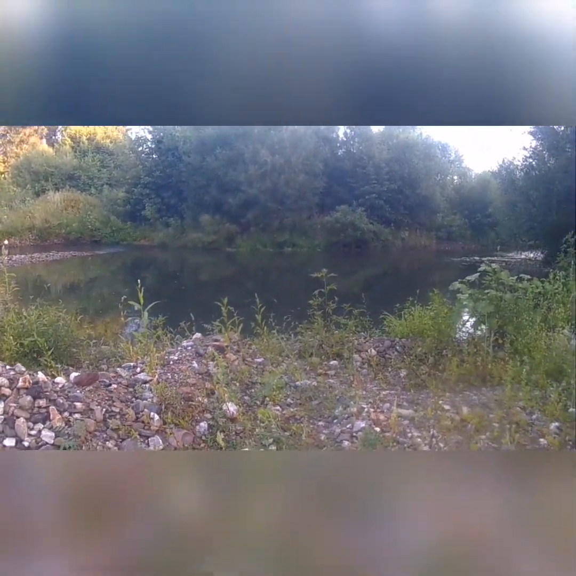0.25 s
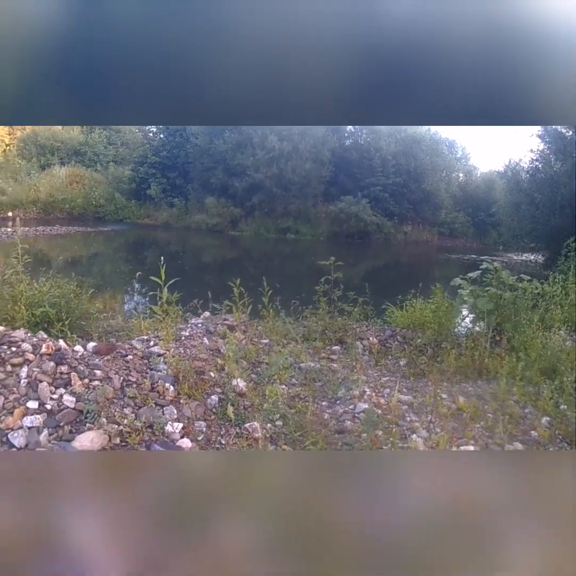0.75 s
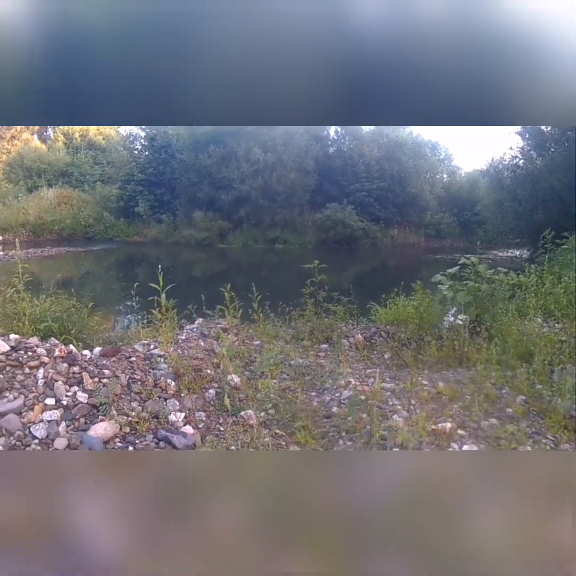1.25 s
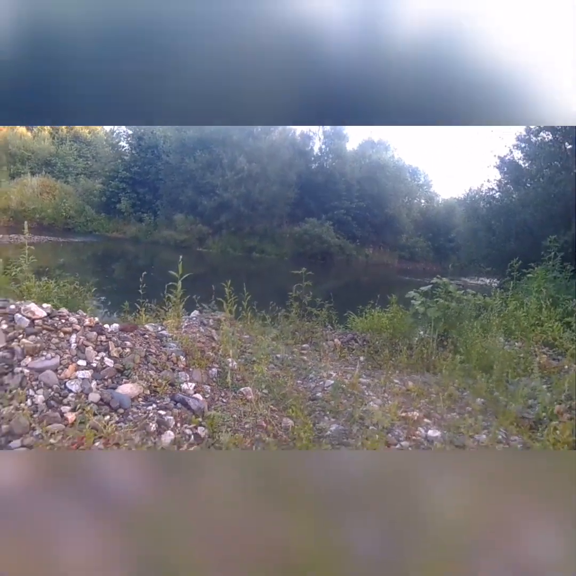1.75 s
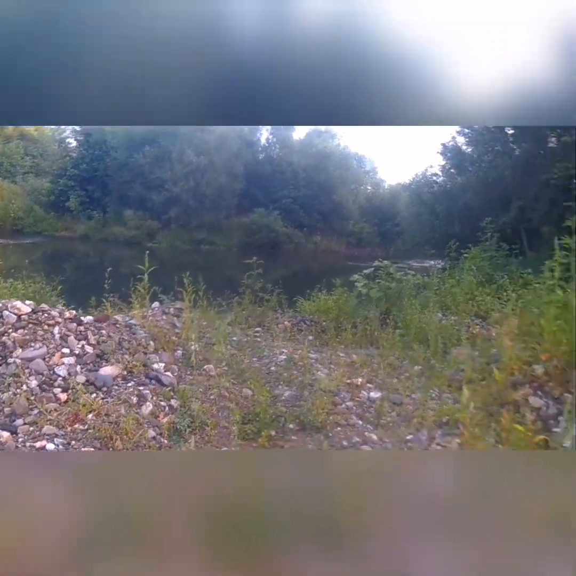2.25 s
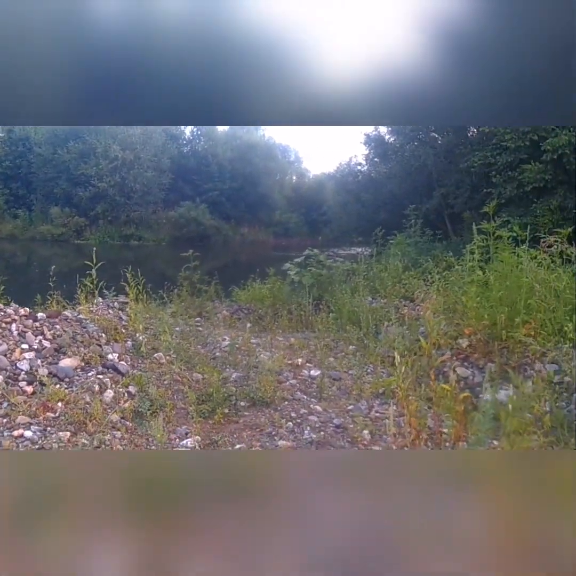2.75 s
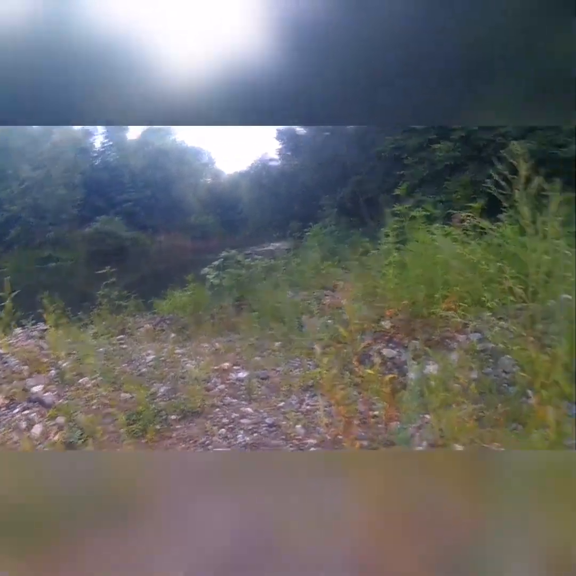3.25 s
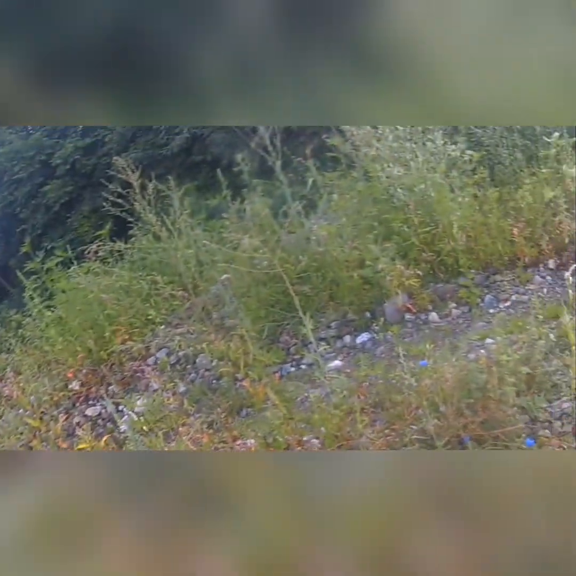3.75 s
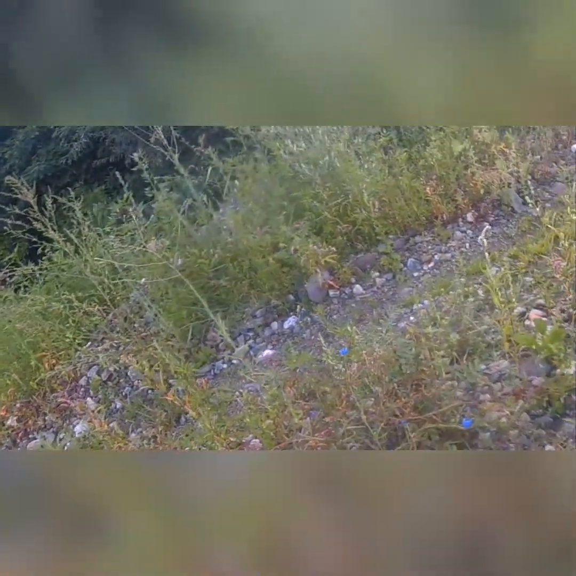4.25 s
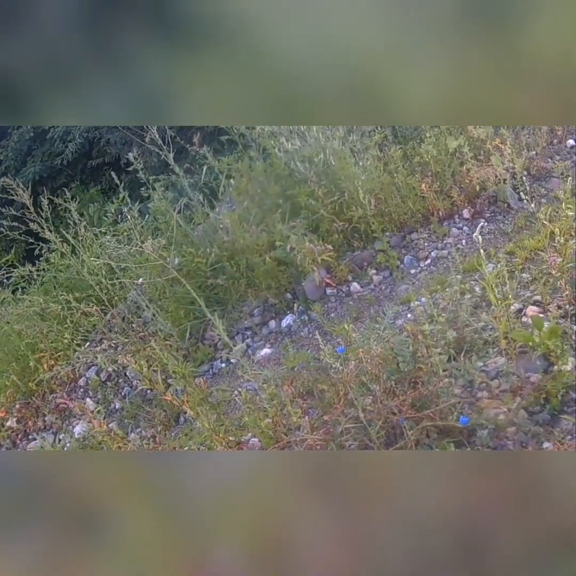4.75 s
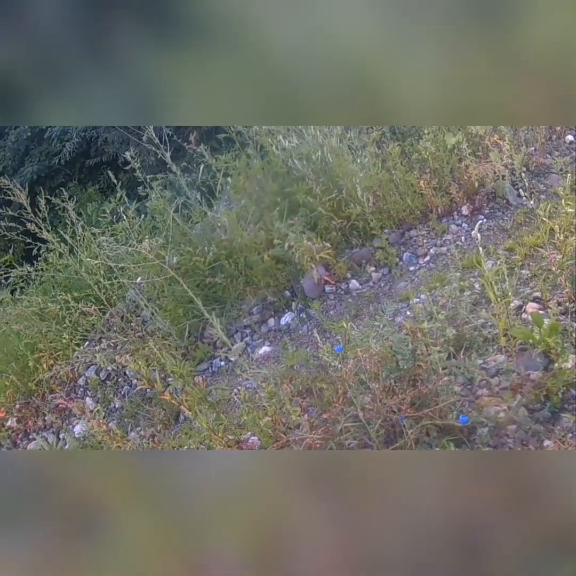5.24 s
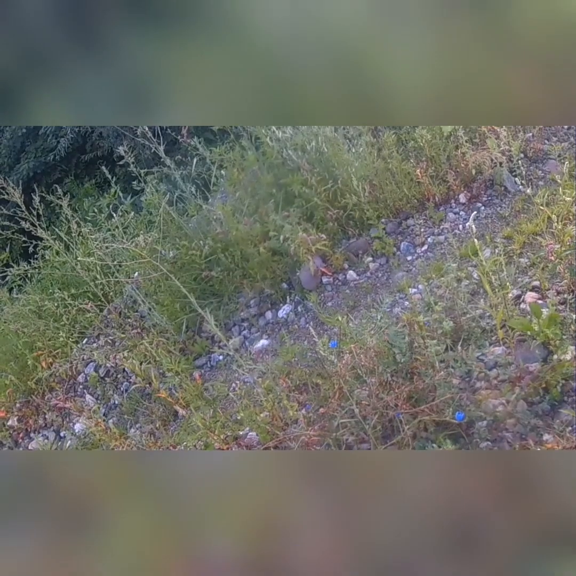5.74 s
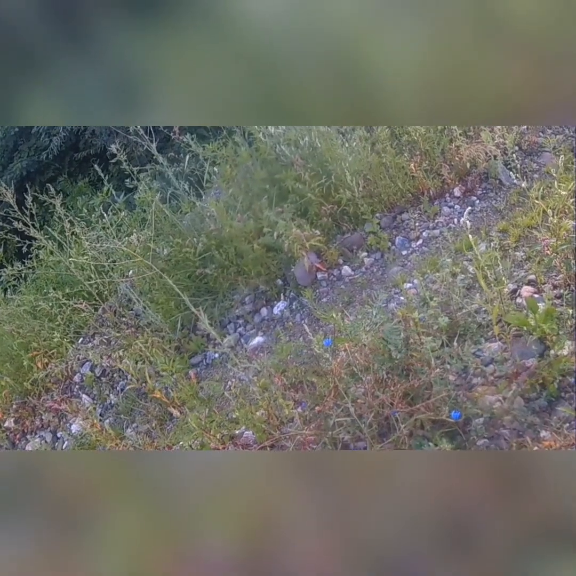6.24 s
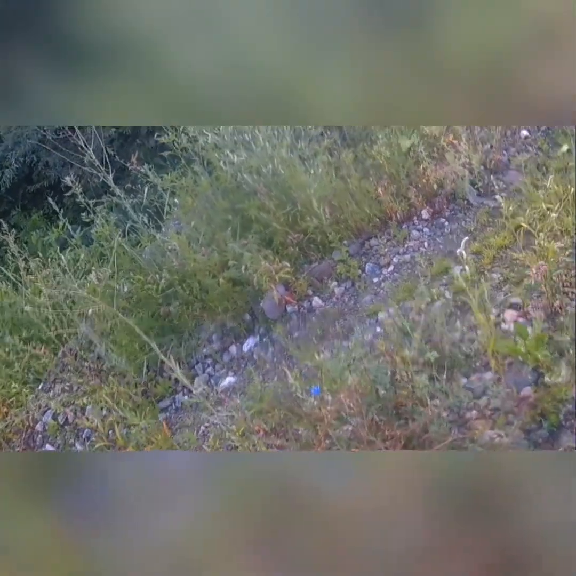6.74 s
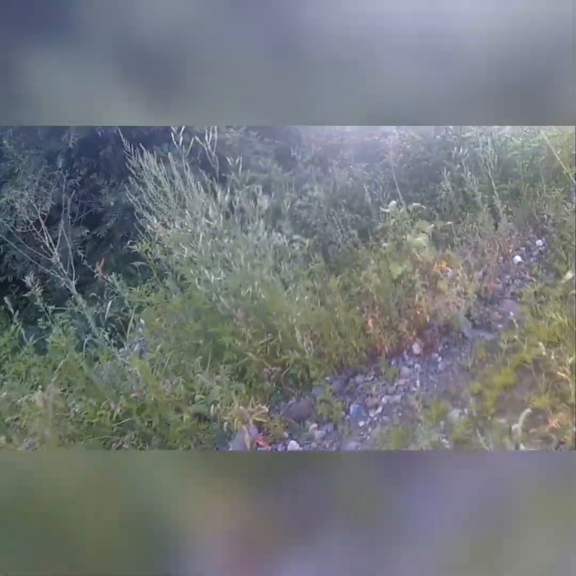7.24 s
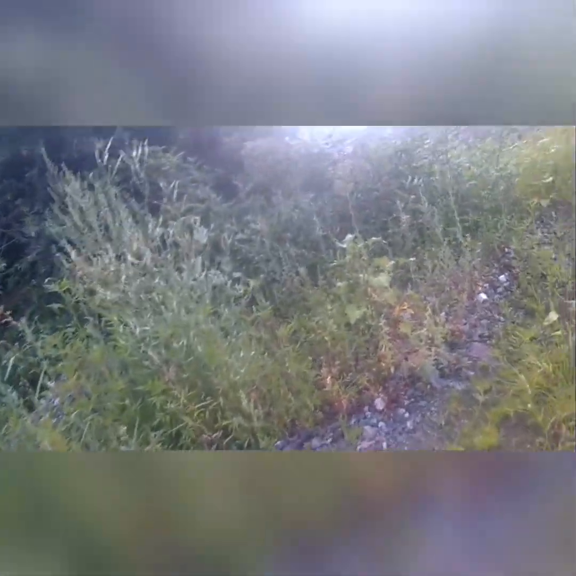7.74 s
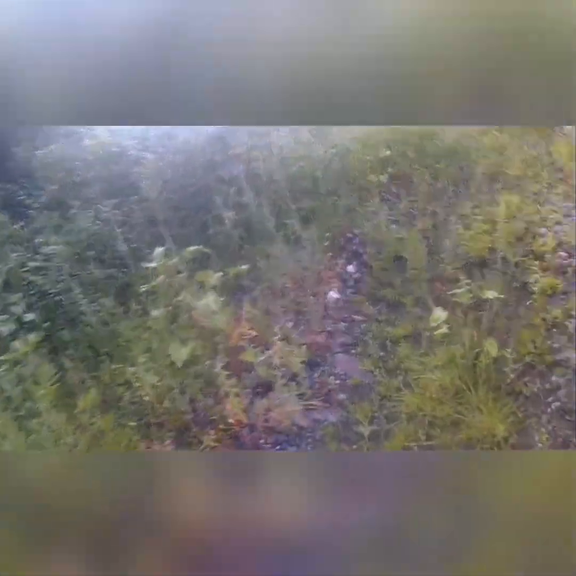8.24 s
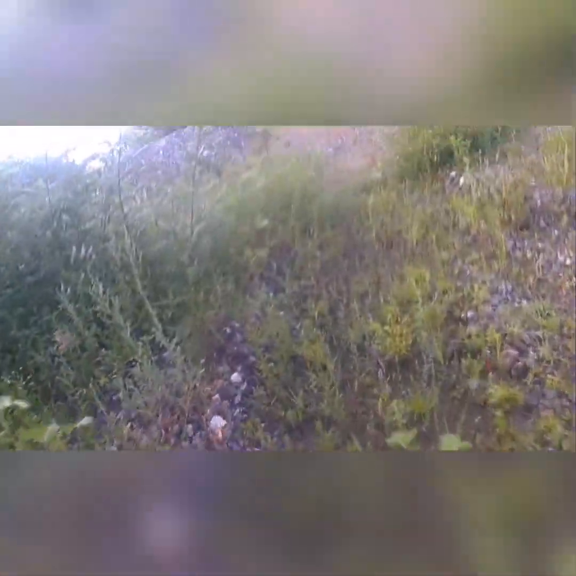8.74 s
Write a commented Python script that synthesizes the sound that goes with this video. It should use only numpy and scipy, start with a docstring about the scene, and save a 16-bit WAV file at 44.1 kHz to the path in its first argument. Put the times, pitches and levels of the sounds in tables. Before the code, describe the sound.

From 0 to about 4 s a small moped idles quietly: rapid, uneven putters around 25 per second, with a hollow metallic ring and scattered short gritty knocks, over very faint hiss. Slight bumps touch the mount near 2.5 and 3.4 s. At 4.1 to 4.6 s the engine starts to pull, its ring roughens, and several dull jolts thump. After a brief calmer spell, stronger jolts with rattles cluster at 5.3 to 6 s while the engine rises; a hard, short crack lands at 6 s. From about 6.2 s the camera housing slams and jiggles in its mount, a loud, harsh, overloaded buzz near 60 beats per second with loose plastic clatter. It eases briefly around 7.4 s, with two jolts, then surges again, uneven and stone-shaken, and is still going at the end, about 9 s. Close, boxy, narrow microphone sound.

```python
"""A moped idles with a ringing clatter and short knocks, then pulls off into a harsh, overloaded shaking.
Uneven bursts of noise at the firing rate ring the frame. Under way a small camera in a hard housing
swings, jiggles and rattles in its mount; jolts and stones shake it more.
The microphone amplifier clips the sum at its rails; the recorder response, faint hiss and whine follow."""
import sys
import numpy as np
from scipy import signal
from scipy.fft import rfft, irfft
from scipy.io import wavfile
from scipy.ndimage import uniform_filter1d

SR = 44100
rng = np.random.default_rng(int(sys.argv[2]) if len(sys.argv) > 2 else 0)


def bounce(signal):
    """Save signal as a 16-bit WAV file at the path given by the first command-line argument."""
    frames = np.transpose(np.atleast_2d(signal))
    limited = np.clip(frames, -1, 1)
    pcm = np.round(limited * 32767).astype(np.int16)
    wavfile.write(sys.argv[1], SR, pcm)


N = 396459
T_S = np.arange(N) / SR
RAIL = 0.5  # amplifier clipping level, also the scale of swing hardness

# rattle bands of the loose parts; the last feeds the recorder's faint mirrored treble:
# (centre [Hz], width [Hz], relative level [dB])
RATTLE_MODES = [(570, 290, 0.5), (1920, 1200, -3), (2810, 800, 2), (10600, 5400, -3.5)]


def undb(db):
    """Decibels to amplitude."""
    return 10 ** (np.asarray(db) / 20)


def unit(x):
    """Scales to rms 1."""
    return x / np.sqrt(np.mean(x ** 2))


def noise():
    """White noise over the whole scene."""
    return rng.standard_normal(N)


def band(x, hz, width_hz):
    """One resonance, gain 1 at its centre."""
    return signal.lfilter(*signal.iirpeak(hz, hz / width_hz, SR), x)


def ring(x, modes):
    """A body of parallel resonances with alternating signs, summed to rms 1."""
    total = 0
    for k, (hz, width_hz, db) in enumerate(modes):
        total = total + (-1) ** k * undb(db) * unit(band(x, hz, width_hz))
    return unit(total)


def colour(x, table, size=4096):
    """Causal filter through (Hz, dB) points, from the cepstrum of the log gain."""
    hz, db = np.transpose(table)
    bin_hz = np.arange(size + 1) * SR / 2 / size + 1  # 1 Hz offset avoids log(0)
    cepstrum = irfft(np.interp(np.log(bin_hz), np.log(hz), np.log(undb(db))))
    # fold onto positive times: minimum phase
    cepstrum[1:size] *= 2
    cepstrum[size + 1:] = 0
    impulse = irfft(np.exp(rfft(cepstrum)))[:size]
    return signal.fftconvolve(x, impulse)[:N]


def walk(rate_hz):
    """Random levels held 1 / rate_hz and slewed; rms 1."""
    hold = int(SR / rate_hz)
    steps = np.repeat(rng.standard_normal(N // hold + 1), hold)
    return unit(uniform_filter1d(steps, hold)[:N])


def curves(table):
    """Columns of a table after its time column, sample by sample."""
    time_s, *columns = np.transpose(table)
    return [np.interp(T_S, time_s, c) for c in columns]


def add(out, time_s, x):
    """Mixes x in at time_s."""
    i = int(time_s * SR)
    out[i:i + len(x)] += x[:N - i]


def engine():
    """Each firing is a noise burst of its own size over a steady whirr; both ring the frame and rock the mount."""
    # (time [s], mean firing rate [Hz], frame level [dB])
    firing_curve = [(0.0, 24.64, -40), (0.46, 26.95, -40.5), (2.3, 26.45, -41), (2.83, 28.55, -38),
                    (3.75, 25.39, -43.5), (4.43, 27.77, -39), (4.81, 28.01, -40.5), (5.25, 29.5, -40.5),
                    (5.8, 41, -36)]
    # frame at idle: (resonance [Hz], width [Hz], relative level [dB])
    idle_modes = [(756, 213, -2.5), (970, 67, 1.5), (1543, 37, -16), (2045, 220, -13), (2204, 61, -11.5),
                  (2660, 140, -6.5), (3064, 200, -6), (4140, 1400, -5)]
    # frame once the clutch bites: (resonance [Hz], width [Hz], relative level [dB])
    pull_modes = [(730, 100, -3.5), (982, 54, -2.5), (1252, 79, -5), (1577, 30, -9.5), (1880, 650, -4),
                  (2610, 200, -5), (2940, 320, -6.5)]
    # low drone: (resonance [Hz], width [Hz], initial level re idle ring [dB])
    drone_mode = (504, 62, -8)
    # thin panel humming on between firings: (resonance [Hz], width [Hz], level re idle ring [dB])
    panel_mode = (1100, 12.8, -4.5)
    clutch_s = (4.05, 4.35)  # crossfade from idle to pull
    turn_s = 3.2  # the camera has turned away

    firing_hz, level_db = curves(firing_curve)
    turns = np.cumsum(firing_hz * (1 + 0.03 * walk(13))) / SR  # one turn per firing
    sizes = undb(2.6 * np.clip(rng.standard_normal(N // 500), -2, 1.6))
    size = sizes[turns.astype(int)]
    burst = uniform_filter1d(size * np.exp(-(turns % 1) / 0.2), SR // 250)  # 4 ms smoothing
    drive = (burst + 0.51) * noise()
    pull = np.interp(T_S, clutch_s, [0, 1])

    panel_hz, panel_width_hz, panel_db = panel_mode
    panel = undb(panel_db) * unit(band((burst + 0.37) * noise(), panel_hz, panel_width_hz))
    drone_hz, drone_width_hz, drone_db = drone_mode
    drone_gain = np.where(T_S < turn_s, 1, 0.2) * undb(drone_db)
    drone = drone_gain * unit(band(drive, drone_hz, drone_width_hz))
    idle = unit(ring(drive, idle_modes) + panel + drone)
    frame = (1 - pull) * idle + pull * ring(drive, pull_modes)

    # the mount rocks more as it tilts, up to turn_s
    rock = undb(-14) * unit(band(drive, hz=61, width_hz=21))
    rock += undb(-23) * unit(band(drive, hz=28, width_hz=45))
    rock += undb(-18) * unit(band(drive, hz=140, width_hz=24))
    rock += undb(-17) * unit(band(drive, hz=260, width_hz=94))
    rock_gain = undb(np.interp(T_S, (0, turn_s), (-42, -35)))

    rumble = pull * undb(-43.5 + 3.6 * walk(25)) * unit(band(noise(), hz=90, width_hz=180))
    return rumble + undb(level_db) * frame + rock_gain * rock


def knock(hz, rise_s, fade_s, grit_share):
    """A short sine ring with broadband grit under one envelope."""
    t_s = np.arange(SR // 20) / SR
    grit = band(2 * rng.standard_normal(len(t_s)), hz=950, width_hz=1900)
    envelope = np.minimum(t_s / rise_s, 1) * np.exp(-np.maximum(t_s - rise_s, 0) / fade_s)
    return envelope * (np.sin(2 * np.pi * hz * t_s) + grit_share * grit)


def knocks():
    """Short gritty rings at set times over the firings, and one hard blow on the housing."""
    # (time [s], level [dB], pitch [Hz])
    knock_list = [(0.4833, -34, 1580), (0.7054, -37, 1550), (1.4507, -35, 1530), (1.721, -31, 1920),
                  (1.872, -36, 1490), (2.023, -33, 1610), (2.1424, -38, 1880), (2.252, -36, 1520),
                  (2.33, -37, 1600), (2.9112, -35, 1520), (2.95, -33, 1888), (3.3365, -33, 1948),
                  (3.7037, -41, 2240), (4.198, -39, 1840), (4.4404, -36, 1570), (4.5032, -40, 1790),
                  (4.7983, -35, 1300), (5.1604, -35, 1261)]
    # one blow: (time [s], level [dB], pitch [Hz], rise [s], fade [s], grit share)
    blow = (6.0092, -5, 1080, .003, .0015, .8)
    out = np.zeros(N)
    for time_s, db, hz in knock_list:
        add(out, time_s, undb(db) * knock(hz, rise_s=0.0033, fade_s=0.0031, grit_share=1.5))
    blow_s, blow_db, *blow_shape = blow
    add(out, blow_s, undb(blow_db) * knock(*blow_shape))
    return out


def jolts():
    """A jolt builds a swing of the mount up to one deep dip, rebounds slowly and rattles the loose parts."""
    # (time of the dip [s], depth [dB], rattle level [dB])
    jolt_list = [(2.04, -44, -38), (2.51, -37, -41.5), (3.359, -40, -59), (3.709, -39, -44.5),
                 (3.97, -38, -50), (4.172, -16, -50), (4.319, -14.5, -46), (4.41, -28, -48),
                 (4.461, -24, -46), (4.532, -21, -49), (4.6, -21, -46), (4.637, -15, -42),
                 (5.171, -21.5, -44), (5.332, -12, -30), (5.389, -10, -32), (5.44, -3.5, -25),
                 (5.497, -8, -22.5), (5.544, -7.5, -22), (5.605, -11, -38), (5.738, -13, -46),
                 (5.858, -8, -25), (5.903, -0.5, -19.5), (5.969, -8, -22), (7.405, -16, -30),
                 (7.492, -12, -26)]
    # ring by depth: (depth [dB], pitch [Hz], fade [s])
    jolt_ring = [(-45, 145, .03), (-14, 130, .007), (-4, 158, .012)]
    build_s = 0.006
    out, rattle_gain = np.zeros(N), np.zeros(N)
    t_s = np.arange(-0.08, 0.12, 1 / SR)  # 0 at the dip
    depths_db, pitches_hz, fades_s = np.transpose(jolt_ring)
    for time_s, db, rattle_db in jolt_list:
        hz = np.interp(db, depths_db, pitches_hz)
        fade_s = np.interp(db, depths_db, fades_s)
        envelope = np.exp(-np.abs(t_s) / np.where(t_s < 0, build_s, fade_s))
        dip = -envelope * np.cos(2 * np.pi * hz * t_s)
        rebound_envelope = 1.7 * np.clip(t_s * hz * 2, 0, 1) * np.exp(-np.abs(t_s) / 0.01)
        rebound = rebound_envelope * np.cos(2 * np.pi * 18 * t_s)
        add(out, time_s + t_s[0], undb(db) * (rebound + dip))
        # rattle is full during the build, then fades
        shake = np.where(t_s < 0, t_s > -1.5 * build_s, np.exp(-(t_s / fade_s) ** 2))
        add(rattle_gain, time_s + t_s[0], undb(rattle_db) * shake)
    return out + rattle_gain * undb(3.5 * walk(300)) * ring(noise(), RATTLE_MODES)


def stones():
    """Each stone under the wheels swells and dies at fixed dB rates; returns jiggle and rattle gains."""
    # (time of the peak [s], jiggle level [dB], rattle level [dB])
    stone_list = [(5.52, -14.5, -41.5), (5.78, -22, -50), (5.96, -12, -33), (6.159, -5.5, -33),
                  (6.26, -8.5, -13.5), (6.318, -.5, -16.5), (6.481, -12.5, -22), (6.64, -7, -5),
                  (6.739, -13.5, -13.5), (6.86, -8, -21), (6.94, -6, -20), (7.02, -12, -22),
                  (7.14, -6, -18), (7.365, -17, -24), (7.54, -13, -30), (7.62, -10, -22),
                  (7.76, -19, -19.5), (7.86, -11.5, -26.5), (8.021, -24.5, -17), (8.1, -19, -13.5),
                  (8.17, -6, -15), (8.24, -5, -19), (8.3, -14, -22), (8.42, -19, -18), (8.47, -5.5, -15),
                  (8.54, -10, -17), (8.63, -6, -22), (8.8, -3, -18), (8.959, -10.5, -23)]
    rise_db_per_s, fall_db_per_s = 171, 171.5
    jiggle, rattle = 0, 0
    for time_s, jiggle_db, rattle_db in stone_list:
        after_s = T_S - time_s
        shape_db = np.where(after_s < 0, rise_db_per_s * after_s, -fall_db_per_s * after_s)
        jiggle = np.hypot(jiggle, undb(jiggle_db + shape_db))
        rattle = np.hypot(rattle, undb(rattle_db + shape_db))
    return jiggle, rattle


def ride():
    """The camera swings between the stops of its mount, some reversals soft, some a slam, and rattles."""
    # (time [s], mean swing rate [Hz], mean swing width [dB])
    swing_curve = [(5.2, 34.03, -42), (5.5, 41.57, -33), (5.76, 40.85, -24), (6.08, 53.4, -16),
                   (6.2, 62.02, -1.5), (6.32, 70.62, -2), (6.4, 63.77, -7), (6.62, 61.45, 5),
                   (6.88, 58.56, -2.5), (6.97, 56, -3.5), (7.06, 54, -1), (7.14, 57.88, -2),
                   (7.28, 54.7, -6), (7.42, 50.31, -22), (7.6, 52.2, -4), (7.76, 61, 0), (7.92, 57.39, -2),
                   (8.08, 61.12, 2), (8.18, 66.93, -0.5), (8.32, 62.95, -6), (8.4, 53.56, -1),
                   (8.5, 56, -6), (8.62, 63, 4.5), (8.88, 54.97, -1), (8.99, 56.27, -2.5)]
    # throb at twice the swing rate: (swing rate [Hz], level re swing width [dB])
    double_curve = [(43, 6), (52, -14)]
    mount_hz, mount_width_hz = 138.5, 64
    # floors between stones: level at 0 dB swing, and dB per dB of swing
    jiggle_db, jiggle_follow = -18, 0.37
    rattle_db, rattle_follow = -25, 0.85

    swing_hz, swing_db = curves(swing_curve)
    jiggle_gain, rattle_gain = stones()
    jiggle_gain = np.hypot(jiggle_gain, undb(jiggle_db + jiggle_follow * swing_db))
    rattle_gain = np.hypot(rattle_gain, undb(rattle_db + rattle_follow * swing_db))
    moving = np.clip((T_S - swing_curve[0][0] + 0.22) / 0.39, 0, 1)
    turns = np.cumsum(swing_hz * (1 + 0.085 * walk(110))) / SR
    width = undb(swing_db + 1.6 * walk(45))

    # one random hardness for each reversal; a wider swing slams harder
    chance = rng.exponential(1, N // 100)[(2 * turns + 0.5).astype(int)]
    hardness = 0.16 + 0.6 * chance ** 1.96 * (width / RAIL) ** 2.6
    swing = width * np.tanh(hardness * np.sin(2 * np.pi * turns)) / np.tanh(hardness)
    double_gain = undb(np.interp(swing_hz, *np.transpose(double_curve)))
    swing += width * double_gain * np.sin(4 * np.pi * turns)

    # every turn also kicks the mount, so its ring shows multiples of the swing rate
    kicks = np.exp(8 * np.cos(2 * np.pi * turns)) * undb(4.44 * walk(60))
    shake = noise() * undb(5.5 * walk(40)) + 0.25 * unit(kicks)
    mount_ring = band(band(shake, mount_hz, mount_width_hz), mount_hz, width_hz=220)
    jiggle = unit(mount_ring)
    jiggle += 0.13 * unit(band(shake, hz=447, width_hz=270))
    jiggle += 0.66 * unit(band(shake, hz=85, width_hz=120))
    jiggle = unit(jiggle)

    # loose parts clatter after every reversal, the more the harder it was
    clatter = 0.35 + chance * np.exp(-(2 * turns % 1) / 0.094)
    rattle = ring(clatter * undb(3.1 * walk(90)) * noise(), RATTLE_MODES)
    return moving * (swing + jiggle_gain * jiggle + rattle_gain * rattle)


def scene():
    """Sums engine, knocks, jolts and ride into one channel."""
    return (engine() + knocks() + jolts() + ride())[None]


def record(dry):
    """The amplifier clips at its rails; coupling droop, recorder response, hiss, whine and a low-pass follow."""
    # recorder response: band-limited near 4 kHz, with a faint mirrored treble
    # from resampling above 8 kHz: (frequency [Hz], gain [dB])
    response = [(60, -19), (100, -18), (200, -15.4), (500, -9.2), (900, -4.3), (1150, 0), (1385, 6.5),
                (1700, 2.2), (2020, 3.6), (2600, -6.2), (3050, -5.6), (4600, -26), (6300, -52), (8000, -60),
                (10000, -42), (16000, -46)]
    # hiss spectrum: (frequency [Hz], relative density [dB])
    hiss_spectrum = [(3000, -13), (5000, -2.5), (6200, -25), (8000, -18), (10000, -7), (12500, -5),
                     (15500, -10.5)]
    # faint steady tones: (frequency [Hz], rms level [dB])
    whine_tones = [(15119, -102), (15212, -95.5)]
    coupling_hz, hiss_db, top_hz = 4.7, -78.5, 16200

    clipped = np.clip(dry[0], -RAIL, RAIL)
    coupled = signal.lfilter(*signal.butter(1, coupling_hz, "high", fs=SR), clipped)
    x = colour(coupled, response)
    x += undb(hiss_db) * unit(colour(noise(), hiss_spectrum))
    for hz, db in whine_tones:
        x += undb(db) * np.sqrt(2) * np.sin(2 * np.pi * hz * T_S)
    low_pass = signal.ellip(8, 0.2, 70, top_hz, fs=SR, output="sos")  # 0.2 dB ripple, 70 dB stop
    return signal.sosfilt(low_pass, x)[None]


dry = scene()
out = record(dry)
bounce(out)
```